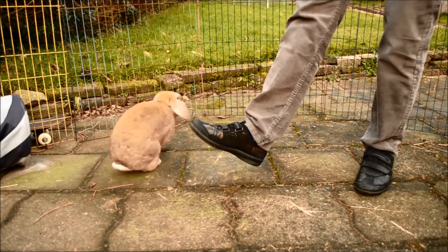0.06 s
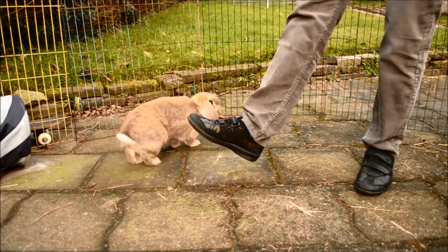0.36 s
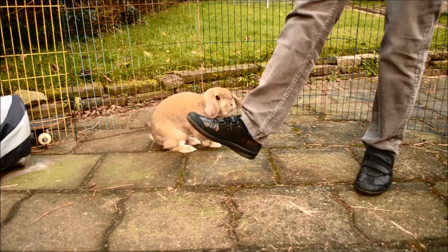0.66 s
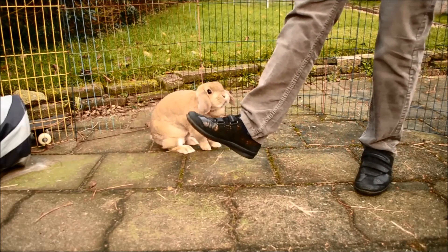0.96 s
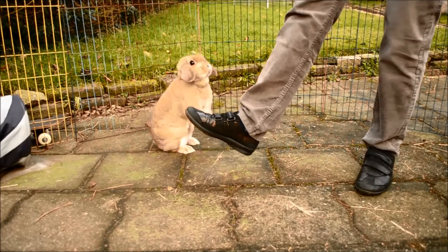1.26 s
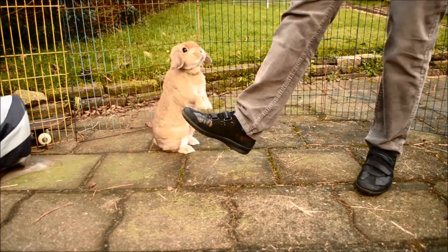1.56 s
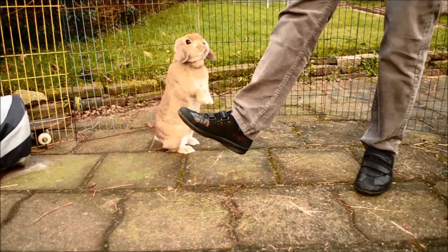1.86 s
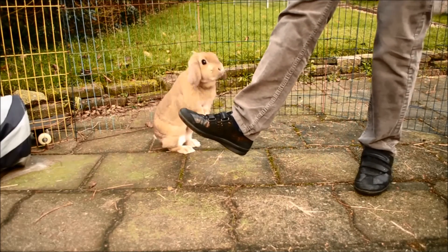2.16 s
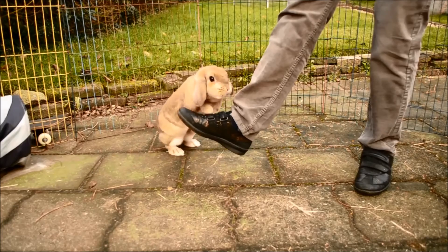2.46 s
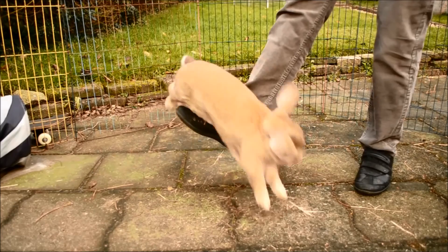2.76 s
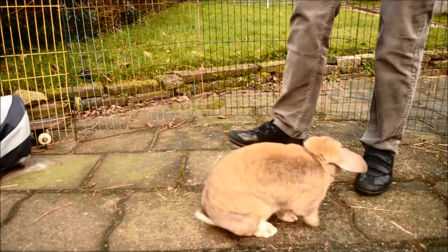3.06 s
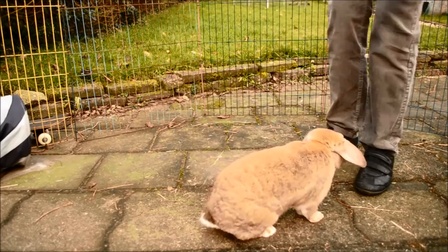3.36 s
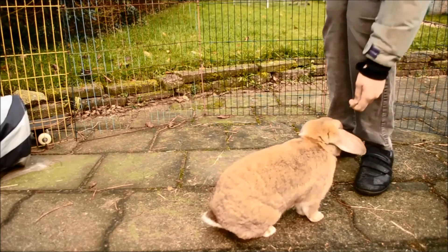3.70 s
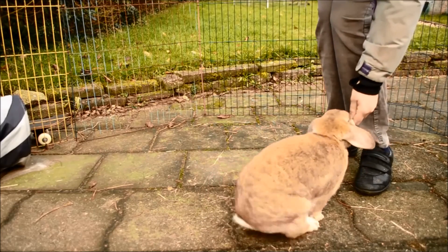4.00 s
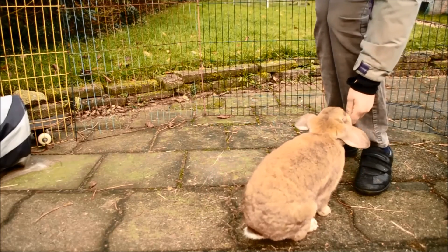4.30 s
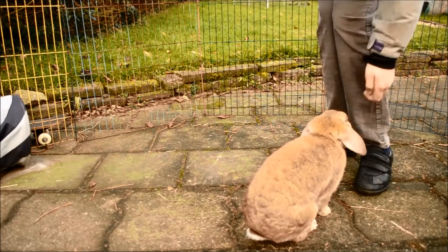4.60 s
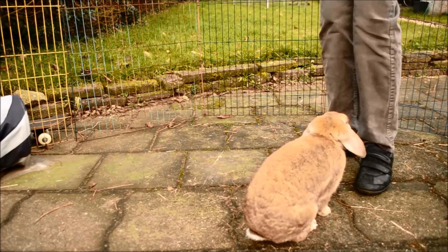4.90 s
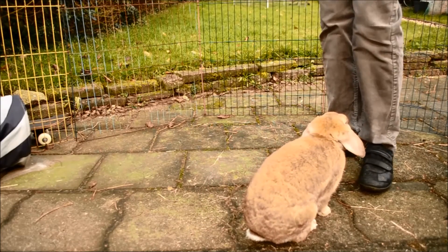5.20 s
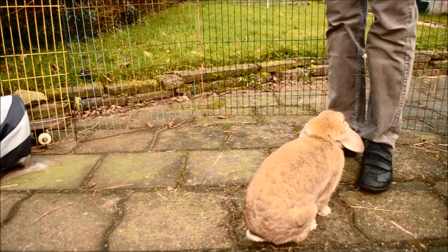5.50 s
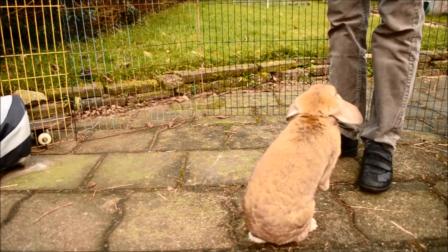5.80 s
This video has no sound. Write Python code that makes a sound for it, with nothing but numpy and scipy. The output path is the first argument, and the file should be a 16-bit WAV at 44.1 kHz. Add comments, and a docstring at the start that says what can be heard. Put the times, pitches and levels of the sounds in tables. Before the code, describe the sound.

In a quiet garden, small birds chirp faintly over a low murmur of distant traffic. Near the middle, a handheld training clicker is pressed and released close to the microphone, giving two loud, sharp metallic snaps in quick succession with a short outdoor echo. Soft scuffs of a rabbit's paws and shoes on paving follow, along with a light rustle of clothes.

```python
"""On a paved garden terrace, a training clicker is pressed and released once, close to the microphone.
Its steel tongue buckles twice and rings in damped modes, briefly overloading the input; paving, fence
and house walls reflect and scatter the snaps. Small birds and a far dove sing gliding tones. Friction
gives the noise of a rabbit's soft steps, shoes and rustling clothes, over a murmur of distant traffic."""
import sys
import numpy as np
from scipy import signal
from scipy.fft import rfft, irfft
from scipy.io import wavfile
from scipy.ndimage import uniform_filter1d

SR = 44100
rng = np.random.default_rng(int(sys.argv[2]) if len(sys.argv) > 2 else 0)


def store_pcm(level_fs):
    """Save levels as 16-bit WAV."""
    pcm = np.round(np.clip(level_fs, -1, 1) * 32767).astype(np.int16)
    wavfile.write(sys.argv[1], SR, np.atleast_2d(pcm).T)


N = 266805
TIME = np.arange(N) / SR
PRESS_S, RELEASE_S = 2.7482, 2.878

# modes of the tongue and its case, bent down and sprung back: (f/Hz, relative level/dB, T60/s)
PRESS_MODES = [(1890, -11, 0.0244), (2199, 0.0, 0.0089), (2533, -0.7, 0.0112), (2855, -8.5, 0.0362),
               (3623, -5.3, 0.0057), (3836, 0.2, 0.0052), (4146, -25.2, 0.029), (4645, -5.5, 0.011),
               (5139, -21.4, 0.0362), (5807, -6.3, 0.0065), (6470, -24.1, 0.0221), (7165, -24.0, 0.0362),
               (7607, -13.0, 0.012), (8270, -17.4, 0.0146), (9146, -27.2, 0.0167), (9812, -32.4, 0.0362),
               (10430, -35.2, 0.0096)]
RELEASE_MODES = [(1930, -12.6, 0.0194), (2082, 0.3, 0.0134), (2531, -1.8, 0.0163), (2880, -1.5, 0.013),
                 (3389, -12.1, 0.0052), (3970, -19.5, 0.0268), (4455, -4.6, 0.0142), (5017, -6.8, 0.0242),
                 (5374, -24.0, 0.0252), (6180, -4.5, 0.0052), (6965, -6.5, 0.0066), (7362, -23.3, 0.0263),
                 (8093, -9.2, 0.0091), (8851, -29.0, 0.0362), (9944, -21.8, 0.0277), (10089, -19.3, 0.0182),
                 (10886, -32.9, 0.0362)]
# radiation of the case sideways and backwards, averaged over direction: (f/Hz, gain/dB)
OFF_AXIS_SPECTRUM = [(1000, -12), (1500, -4.5), (1780, 24), (2150, 25.5), (2550, 24), (2950, 21), (3300, 8),
                     (4000, 12), (4500, 16.5), (5100, 16), (5700, 9), (8200, 10), (10300, 6.5), (11500, -3)]
# reflections from nearby hard surfaces: (delay/s, gain/dB)
REFLECTIONS = [(0.0118, -18.5), (.0201, -14.5), (0.0244, -19), (.028, -29.5), (0.0404, -27), (.084, -34.5),
               (.138, -42)]
# diffuse scatter from the garden: (f/Hz, early level/dB, early T60/s, late level/dB, late T60/s)
SCATTER_BANDS = [(500, -21.5, 0.099, -37.5, 0.38), (1698, -19.5, 0.18, -23, 0.33),
                 (2330, -10.5, 0.071, -16, 0.49), (2887, -11, 0.091, -20.5, 0.42),
                 (3860, -21, 0.13, -28, 0.75), (4500, -12, 0.13, -29.5, 0.59), (5000, -20, 0.12, -28, 0.32),
                 (5500, -14, .1, -24.5, 0.57), (8000, -17, 0.11, -29, .48), (10460, -11, .09, -25, .4),
                 (12060, -26, .06, -48.5, 0.19)]
# notes of small birds and two low dove coos:
# (t/s, duration/s, final f/Hz, starting pitch above final/octaves, level/dB)
BIRD_NOTES = [(0, 0.227, 479, 0.072, -57), (.05, 0.11, 4760, 0.027, -64.5), (.2, .075, 5400, -0.11, -64.5),
              (.275, 0.069, 5420, -0.018, -66.5), (.438, 0.062, 5140, 0.079, -61),
              (.5, 0.084, 5150, 0.026, -61), (.57, 0.1, 468, .03, -57.5), (.769, 0.046, 3960, 0, -69),
              (.925, .052, 4900, .25, -62.5), (.988, .057, 4850, .27, -63.5),
              (1.128, 0.034, 5520, .06, -61.5), (1.186, 0.087, 5420, 0.095, -61),
              (1.288, 0.046, 5320, .12, -62.5), (1.5, 0.049, 5280, -0.022, -62),
              (1.557, 0.043, 5320, -.06, -60), (2.352, 0.016, 3000, 0.044, -60.5),
              (2.392, 0.019, 3290, 0.33, -59), (2.421, 0.025, 2520, 0.27, -53.5),
              (3.02, 0.083, 1200, 0.29, -51.5), (4.135, 0.12, 3780, 0.025, -64.5),
              (4.2, 0.22, 1628, .18, -63), (4.32, 0.087, 2380, 0.049, -62),
              (4.351, 0.064, 3240, 0.097, -67), (4.646, 0.062, 5350, -.25, -69),
              (4.889, 0.051, 4830, .15, -61.5), (4.975, 0.039, 4960, .06, -63.5),
              (5.56, .046, 3840, -.03, -60), (5.623, .2, 5510, 0.0088, -67),
              (5.747, 0.075, 4590, 0.011, -63.5), (5.92, 0.069, 3890, -.11, -59.5),
              (5.987, 0.049, 5570, -0.11, -64.5)]
# spells of farther twittering: (start t/s, end t/s, f/Hz, level/dB)
TWITTER_SPELLS = [(0, .3, 5000, -67.5), (0.551, 0.701, 5330, -67.5), (0.785, 0.997, 6700, -77),
                  (1.802, 2.138, 5200, -67.5), (2.356, 2.72, 7250, -78), (4.05, 4.47, 6920, -79.5),
                  (4.254, 4.7, 4360, -71.5), (4.696, 5.182, 5380, -70.5)]
# paws and shoes on the paving: (t/s, level/dB, centre f/Hz, T60/s)
FOOTFALLS = [(.57, -50, 880, 0.29), (3.2915, -33.5, 1340, .018), (3.372, -38, 404, 0.067),
             (3.376, -42, 960, 0.045), (3.45, -47.5, 424, .095), (3.54, -47.5, 454, 0.16),
             (5.18, -51.5, 443, 0.24), (5.235, -44.5, 453, 0.065), (5.34, -43, 418, 0.045),
             (5.435, -43, 450, 0.07)]
# ticks of grit and creasing cloth: (t/s, level/dB, centre f/Hz, T60/s)
GRIT_TICKS = [(1.753, -52, 3000, .012), (2.68, -65, 9000, .012), (3.335, -56, 9800, .03),
              (3.714, -52.5, 9600, 0.031), (5.184, -56, 8000, 0.032), (5.243, -49, 2960, .02),
              (5.838, -54, 6500, .015)]
# movements of legs and sleeve; swell and fade each span 20 dB:
# (t/s at full speed, swell/s, hold/s, fade/s, treble level/dB, swish f/Hz, swish re treble/dB)
CLOTH_STROKES = [(0.3, 0.31, .02, 0.59, -77, 3000, -9), (0.474, .015, 0.091, 0.35, -71, 3000, -4),
                 (0.853, .2, .1, .1, -85, 3000, -10), (1.433, 0.22, 0.047, .11, -71.5, 3300, 13),
                 (1.703, 0.024, 0.045, 0.41, -71, 3000, 6.5), (3.047, 0.11, 0.079, .3, -76, 2000, 3.5),
                 (3.33, 0.16, 0.044, 0.71, -69, 2312, 5), (3.618, 0.23, 0.078, 0.31, -77.5, 1980, 10),
                 (4.75, .5, 0.44, 0.22, -78, 1910, 11.5), (5.235, 0.012, 0.011, 0.036, -71.5, 2800, 8),
                 (5.29, 0.026, .02, 0.33, -67, 1800, -1), (5.506, 0.67, 0.11, 0.27, -67.5, 2080, 1.5),
                 (5.868, .03, 0.049, 0.054, -70.5, 2800, 16)]
# friction of cloth on cloth: (f/Hz, relative spectral level/dB)
CLOTH_SPECTRUM = [(100, -9), (280, -1), (430, 11), (750, 6.5), (1500, 8.5), (3000, 4), (5000, 1.5),
                  (7000, -2.5), (8000, -8), (10000, -7), (11200, -17), (11800, -31.5)]
# distant traffic and leaves: (f/Hz, relative spectral level/dB)
MURMUR_SPECTRUM = [(15, -65), (25, -41.5), (54, -5), (91, -9), (124, -4), (291, -6), (367, -2), (429, -3.5),
                   (620, -4.5), (740, -8), (1100, -4), (1400, -6.5), (1700, -11.5), (2150, -14),
                   (2900, -18.5), (5120, -25.5), (10300, -42.5), (12000, -53), (15600, -83.5),
                   (22000, -120)]
# tones of a far engine: (f/Hz, initial level/dB, end t/s)
ENGINE_TONES = [(137, -67.3, 1.4), (200, -71.5, 2.5)]


def snap(modes, ring_db, cutoff_hz, thump_db, thump_hz, null_hz=3220, null_q=14, rise_s=0.00025):
    """Buckling excites the tongue's damped modes; the overloaded input adds a dull low thump."""
    t = TIME[:SR // 8]
    ring = sum(undb(db) * np.sin(2 * np.pi * hz * t) * decay(t, t60) for hz, db, t60 in modes)
    ring *= 1 - np.exp(-t / rise_s)
    # so small a case radiates almost nothing below its first resonance
    ring = signal.sosfilt(signal.cheby1(6, .5, cutoff_hz, "high", fs=SR, output="sos"), ring)
    # its radiation cancels just above the low group of modes
    ring = signal.lfilter(*signal.iirnotch(null_hz, null_q, fs=SR), ring)
    thump = band(1. * (t == 0), 25, thump_hz)
    return undb(ring_db) * ring + undb(thump_db) * thump / thump.max()


def clicker():
    """Snap-through occurs on press and on release, each shape of the tongue having its own modes."""
    out = np.zeros(N)
    add(out, PRESS_S, snap(PRESS_MODES, ring_db=0.5, cutoff_hz=1730, thump_db=-36.5, thump_hz=1200))
    add(out, RELEASE_S, snap(RELEASE_MODES, ring_db=0, cutoff_hz=1705, thump_db=-19.5, thump_hz=1100))
    return out


def off_axis_crack(press_db=0, release_db=2):
    """Averaged over direction, the modes blend into a toneless crack, heard only by reflection."""
    impulses = np.zeros(N)
    add(impulses, PRESS_S, undb([press_db]))
    add(impulses, RELEASE_S, undb([release_db]))
    return colour(impulses, OFF_AXIS_SPECTRUM)


def garden(x, build_s=0.008, specular_hz=(300, 5000)):
    """Specular reflection gives distinct echoes; diffuse scattering gives an exponential tail."""
    t = TIME[:SR * 2 // 3]
    f = np.fft.rfftfreq(len(t), 1 / SR)
    noise = rfft(rng.standard_normal(len(t)))
    centres = [row[0] for row in SCATTER_BANDS]
    response = np.zeros(len(t))
    for delay, db in REFLECTIONS:
        add(response, delay, undb([db]))
    # rough surfaces mirror the lower tones and scatter the treble
    response = band(response, *specular_hz)
    build_up = 1 - np.exp(-(t / build_s) ** 2)
    for share, (_, early_db, early_t60, late_db, late_t60) in zip(np.eye(len(centres)), SCATTER_BANDS):
        band_noise = irfft(noise * np.interp(f, centres, share), len(t))
        # early from paving and fence, late from houses and trees
        for db, t60 in ((early_db, early_t60), (late_db, late_t60)):
            envelope = decay(t, t60) * build_up
            response += undb(db) * band_noise * envelope / np.linalg.norm(envelope)
    return signal.fftconvolve(x, response)[:N]


def birds(flutter_db=2.5, unsteadiness=0.009, trees_db=-3, trees_t60=0.37):
    """Whistles, modulated in frequency and amplitude, are smeared by scattering among the trees."""
    song, flutter = np.zeros(N), wander(120)
    wobble = 1 + unsteadiness * wander(300)
    for at, length, final_hz, octaves, db in list(BIRD_NOTES) + twitter():
        progress = np.linspace(0, 1, int(length * SR))
        span = (int(at * SR) + np.arange(len(progress))) % N
        hz = final_hz * 2 ** (octaves * (1 - progress)) * wobble[span]
        envelope = np.abs(np.sin(np.pi * progress)) ** .5 * undb(db + flutter_db * flutter[span])
        add(song, at, envelope * np.sin(2 * np.pi * np.cumsum(hz) / SR))
    trees = rng.standard_normal(SR // 2) * decay(TIME[:SR // 2], trees_t60)
    return song + undb(trees_db) * signal.fftconvolve(song, trees / np.linalg.norm(trees))[:N]


def twitter(chirp_s=0.013, pitch_spread=.05, glide_octaves=.12, count=18):
    """Runs of short frequency sweeps, rising or falling at random, given as rows of bird notes."""
    notes = []
    for start, stop, hz, db in TWITTER_SPELLS:
        for at in np.linspace(start, stop - chirp_s, count):
            late, detune, slide = rng.standard_normal(3)
            final_hz = hz * (1 + pitch_spread * detune)
            notes.append((at + late * chirp_s / 2, chirp_s, final_hz, glide_octaves * slide, db))
    return notes


def scuffs(contacts, spread, rise_s):
    """Brief friction at each contact gives a burst of band noise that decays exponentially."""
    out, t = np.zeros(N), TIME[:SR // 4]
    attack = 1 - np.exp(-t / rise_s)
    for at, db, hz, t60 in contacts:
        add(out, at, undb(db) * noise_band(len(t), hz, spread) * attack * decay(t, t60))
    return out


def clothes(fidget_db=-92.5, grain_db=3.0, flicker_db=0.93):
    """Stick-slip of countless fibres adds in power; a brisk movement also makes the weave swish."""
    rub_power, swish = undb(fidget_db) ** 2, 0  # cloth never lies quite still
    for at, swell, hold, fade, db, swish_hz, swish_db in CLOTH_STROKES:
        before, after = np.maximum(at - TIME, 0), np.maximum(TIME - at - hold, 0)
        stroke = undb(db - 20 * (before / swell + after / fade))
        rub_power += stroke ** 2
        swish += undb(swish_db) * stroke * noise_band(N, swish_hz, spread=0.39)
    slips = colour(rng.standard_normal(N) * undb(grain_db * rng.standard_normal(N)), CLOTH_SPECTRUM)
    treble_rms = band(slips, 7200, 11000, order=4).std()
    rub = slips / treble_rms * np.sqrt(rub_power)
    return (rub + swish) * undb(flicker_db * wander(60))


def traffic(murmur_db=-55.5, swell_db=0.5, waver_db=0.9):
    """Distant incoherent sources sum to a murmur; a far engine's tones fade linearly in power."""
    murmur = unit(colour(rng.standard_normal(N), MURMUR_SPECTRUM))
    murmur *= undb(murmur_db - swell_db * wander(18))
    engine = np.zeros(N)
    for hz, db, end_s in ENGINE_TONES:
        power = np.clip(1 - TIME / end_s, 0, 1)
        amplitude = np.sqrt(2 * power) * undb(db + waver_db * wander(8.5))
        engine += amplitude * np.sin(2 * np.pi * hz * TIME)
    return murmur + engine


def undb(db):
    """Amplitude ratio for a level in decibels."""
    return 10 ** (np.asarray(db) / 20)


def unit(x):
    """Normalisation to rms 1."""
    return x / np.sqrt(np.mean(x ** 2))


def decay(t, t60):
    """Exponential damping by 60 dB in t60 seconds."""
    return np.exp(-np.log(1000) * t / t60)


def add(out, at, x):
    """Superposition of x on out from a time in seconds."""
    i = max(int(at * SR), 0)
    out[i:i + len(x)] += x[:len(out) - i]


def band(x, lo_hz, hi_hz, order=2):
    """Causal band-pass filtering."""
    edges = [lo_hz, min(hi_hz, SR / 2 - 100)]
    return signal.sosfilt(signal.butter(order, edges, "band", fs=SR, output="sos"), x)


def noise_band(samples, hz, spread):
    """Band-limited noise of rms 1, reaching a factor 1 + spread either side of hz."""
    return unit(band(rng.standard_normal(samples), hz / (1 + spread), hz * (1 + spread)))


def colour(x, points):
    """Spectral shaping by (f/Hz, gain/dB) points joined on a log-frequency axis."""
    hz, db = np.transpose(points)
    f = np.maximum(np.fft.rfftfreq(len(x), 1 / SR), 1)
    gain = undb(np.interp(np.log(f), np.log(hz), db)) * np.minimum(f / hz[0], 1)
    return irfft(rfft(x) * gain, len(x))


def wander(rate_hz):
    """Smooth random modulation of rms 1."""
    hold = int(SR / rate_hz)
    stairs = np.repeat(rng.standard_normal(N // hold + 1), hold)
    return unit(uniform_filter1d(uniform_filter1d(stairs, hold), hold)[:N])


def scene(ring_send_db=-5):
    """Direct snaps, their reflections and the quiet garden superpose in one channel."""
    click = clicker()
    steps = scuffs(FOOTFALLS, spread=0.21, rise_s=0.0046)
    ticks = scuffs(GRIT_TICKS, spread=0.082, rise_s=0.00068)
    echoes = garden(undb(ring_send_db) * click + off_axis_crack())
    return (click + echoes + birds() + steps + ticks + clothes() + traffic())[None]


def record(dry, ceiling=0.87, knee=4, cutoff_hz=11400):
    """Saturation of the input flattens the peaks of the snaps; a low-pass removes the top octave."""
    saturated = dry / (1 + np.abs(dry / ceiling) ** knee) ** (1 / knee)
    return signal.sosfilt(signal.ellip(8, .2, 80, cutoff_hz, fs=SR, output="sos"), saturated)


dry = scene()
out = record(dry)
store_pcm(out)
```